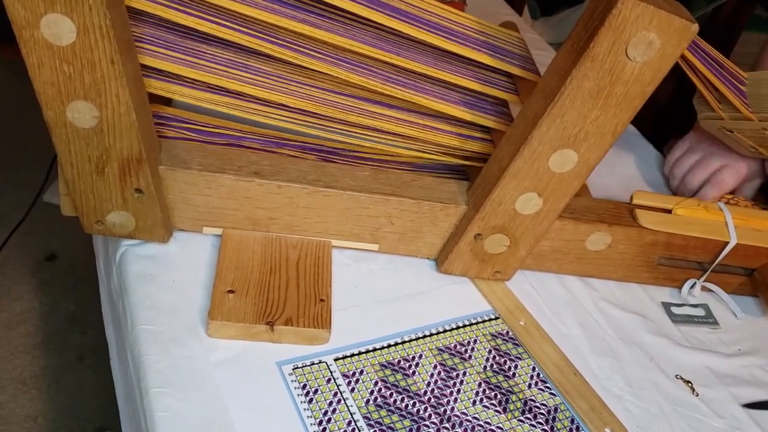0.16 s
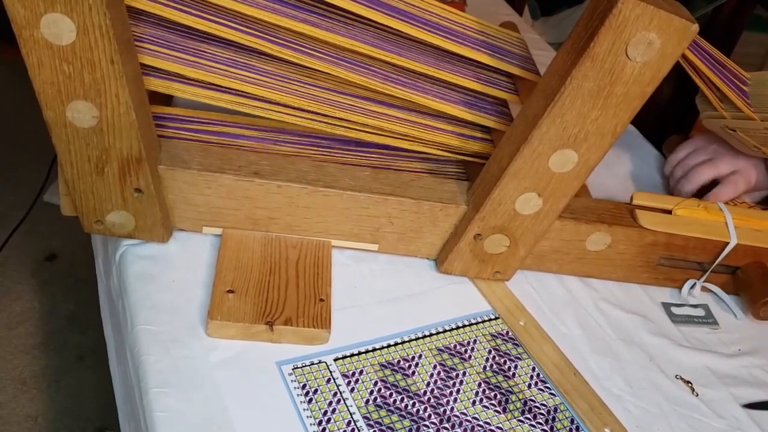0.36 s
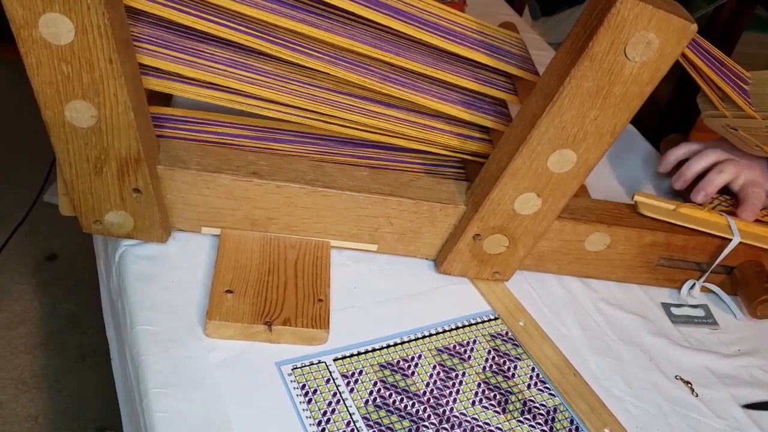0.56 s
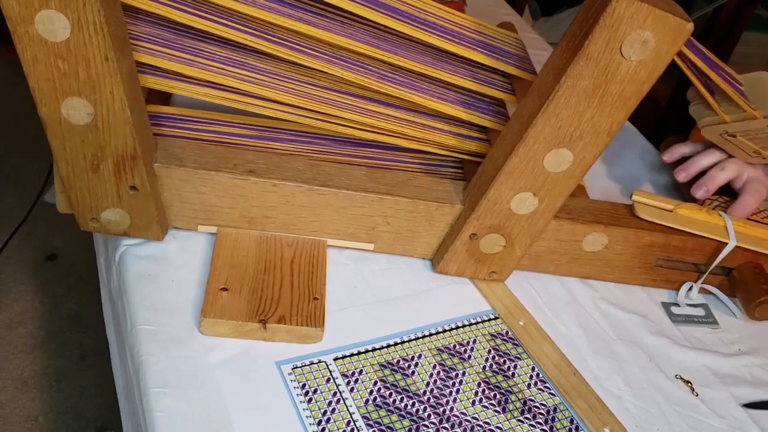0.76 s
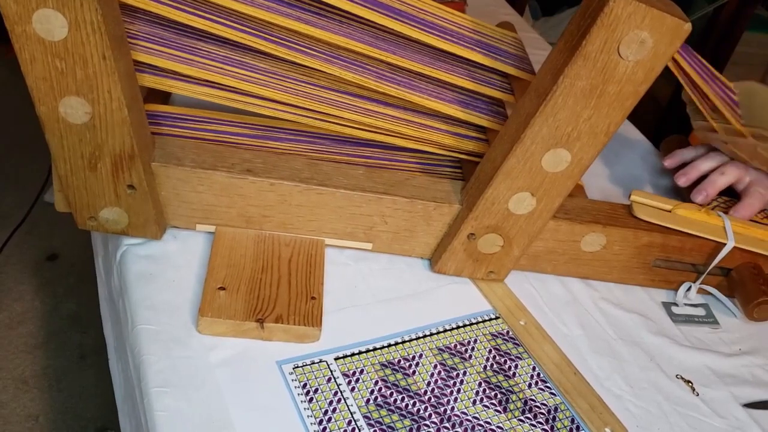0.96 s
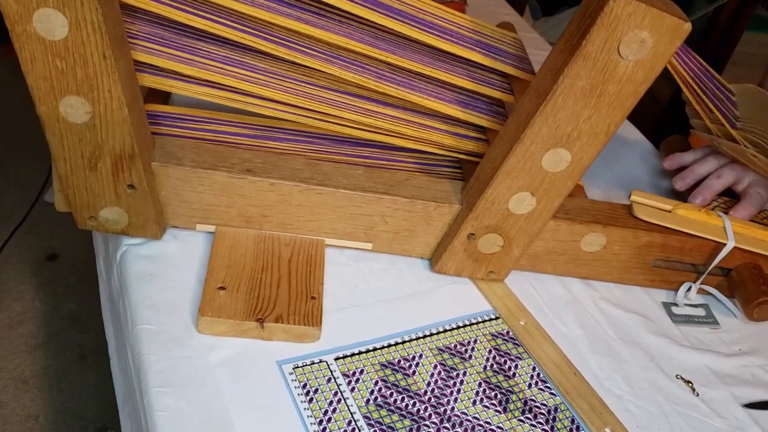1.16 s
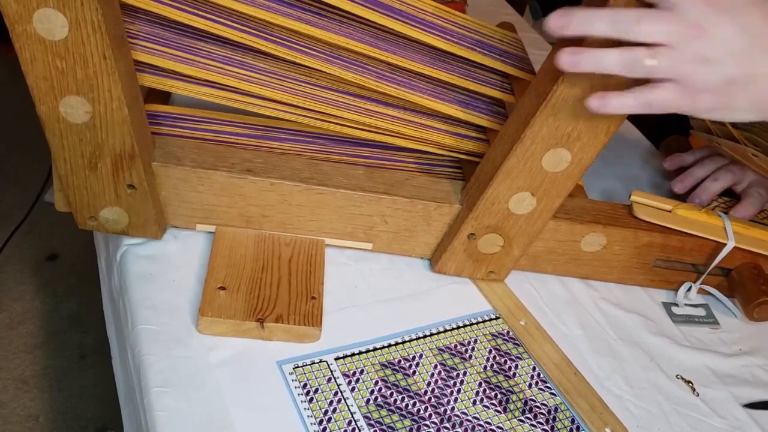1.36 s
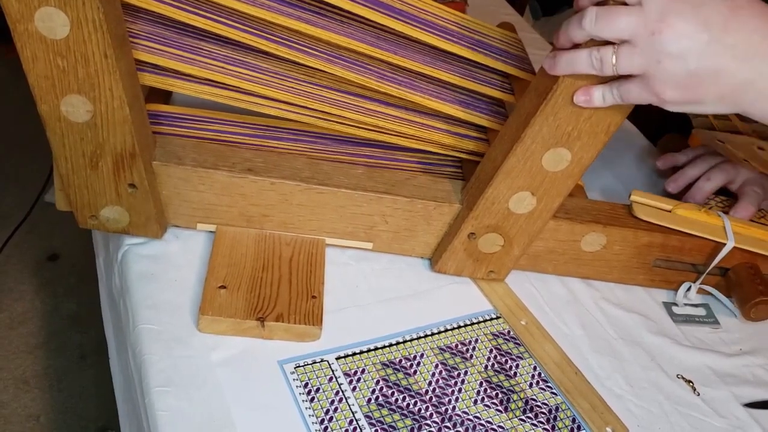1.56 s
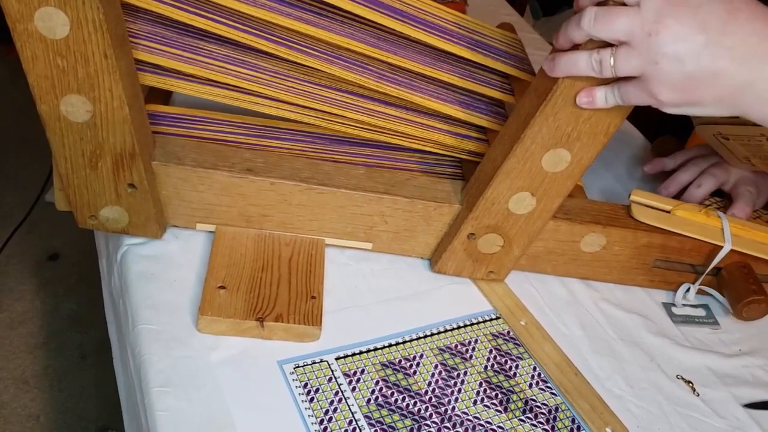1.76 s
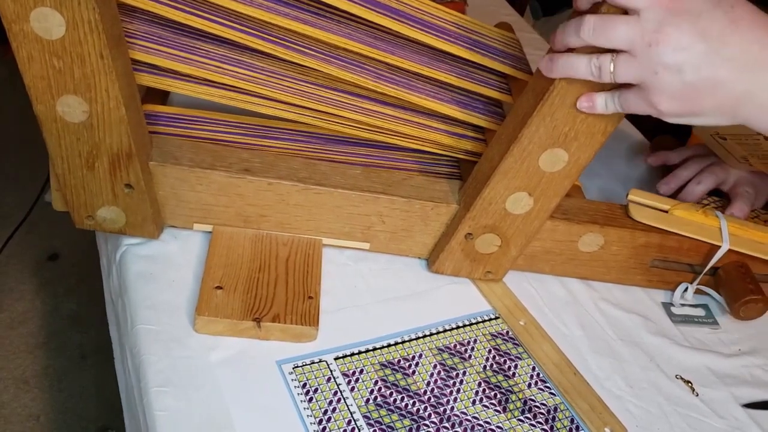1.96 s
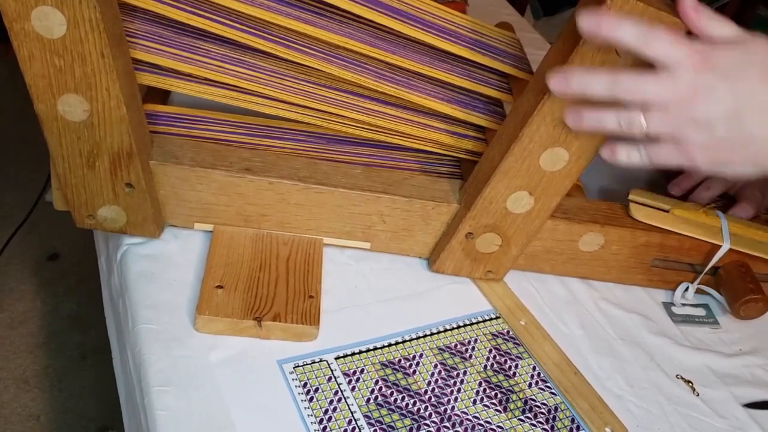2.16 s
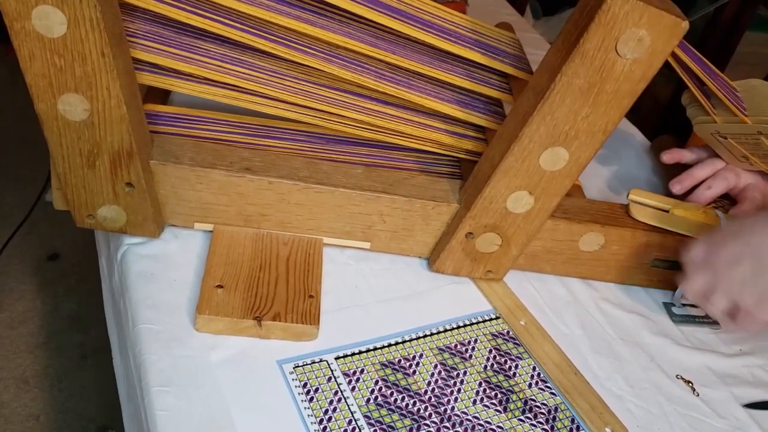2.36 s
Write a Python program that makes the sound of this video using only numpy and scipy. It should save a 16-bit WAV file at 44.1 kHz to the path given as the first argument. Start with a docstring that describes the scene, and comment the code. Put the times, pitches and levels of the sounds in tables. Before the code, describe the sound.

A small wooden loom gives two sharp knocks at about 0.2 and 0.4 seconds, close by in a quiet room. A taut band judders briefly at 0.5 seconds, and threads rub over the wood just after. Near 0.9 seconds a hard tool makes one bright, scraping click, followed by soft thread hiss. From 1.4 to 2.4 seconds fingers lightly brush and bump the frame, with very faint squeaks.

```python
"""A small wooden band loom is worked by hand in a quiet room, close to a pair of microphones.
Two knocks of wood excite the damped modes of its frame, and the taut band judders over it by stick-slip.
A hard tool gives one bright, scraping click. Then threads slide with a soft friction hiss while
fingers bump, brush and squeak on the wood. Short reverberation and a faint rumble lie behind it all."""
import sys
import numpy as np
from scipy import signal
from scipy.fft import rfft, irfft
from scipy.io import wavfile
from scipy.ndimage import uniform_filter1d, minimum_filter1d

SR = 44100
rng = np.random.default_rng(int(sys.argv[2]) if len(sys.argv) > 2 else 0)


def store_wav(level_fs):
    """Save 16-bit WAV to argv[1]."""
    pcm = np.round(np.clip(np.atleast_2d(level_fs), -1, 1) * 32767)
    wavfile.write(sys.argv[1], SR, pcm.T.astype(np.int16))


N = 105840
T = np.arange(N) / SR

# Dull spectrum of soft contacts on the frame (frequency [Hz], level [dB])
PATTER_SPECTRUM = [(30, -19), (80, 6), (330, 4), (650, -8.5), (1300, -23), (3000, -29), (8000, -40.5)]


def knocks():
    """Impact excitation: a crack is filtered by the wood's resonances and sets frame and room ringing."""
    # Blows, one per spot (time [s], swell of the frame [s], then a level [dB] for each band)
    blows = [(.2159, 0.011, -12, -4.5, -18.5, -13, -18.5, -33.5, -11),
             (0.3584, 0.004, -10.5, -1.5, -6.5, -13, -22.5, -36.5, -24)]
    # Bands of those levels (frequency [Hz])
    bands = [150, 330, 700, 2600, 6500, 9300, 13000]
    # Broad resonances of the wood (frequency [Hz], width [Hz], gain at spot 1 [dB], at spot 2 [dB])
    resonances = [(750, 67, 6.5, 6.5), (1102, 78, 9.5, 6.5), (1795, 160, 2.5, 5), (2680, 170, 4.5, 2.5),
                  (2990, 130, -4.5, 6), (3200, 300, 0, -0.5), (3940, 220, 5.5, 7), (4330, 170, -6, 0),
                  (6380, 330, 7, 8)]
    # Frame modes (frequency [Hz], T60 [s], level at spot 1 [dB], at spot 2 [dB])
    frame_modes = [(83, 0.26, -41, -36.5), (126, 0.34, -34.5, -41), (151, .3, -48, -28),
                   (199.8, 0.38, -38.5, -34), (315.7, 0.28, -47, -27), (377.5, 0.2, -34.5, -31),
                   (466.5, 0.18, -40.5, -30), (609, 0.15, -53, -29), (751, 0.14, -32, -28.5),
                   (1104, 0.29, -41, -39.5), (1406, 0.38, -53.5, -43), (1772, 0.15, -30.5, -28.5),
                   (1863, .15, -51.5, -35), (2600, 0.33, -36, -49), (2686, 0.3, -37, -48),
                   (2730, 0.22, -56, -42), (3840, 0.18, -45, -41), (4000, 0.16, -44.5, -39.5)]
    # Spectrum of the direct crack (frequency [Hz], level [dB])
    crack_spectrum = [(40, -19), (150, -8), (600, -7.5), (1300, 0), (2700, 12), (4200, 5), (6500, 7),
                      (8500, 16), (10000, 13.5), (13500, 14.5), (16000, 0)]
    # Spectrum of its reverberation (frequency [Hz], level [dB])
    tail_spectrum = [(30, -20), (55, -1), (130, 3.5), (330, -2.5), (1200, -7.5), (2700, -5), (3900, 1.5),
                     (5000, -5.5), (6500, -1), (8000, 2), (14000, -4), (15500, -16.5)]
    out, grid_hz = np.zeros((2, N)), np.geomspace(40, 16000, 600)
    for spot, (start, swell, *levels) in enumerate(blows):
        wood_db = sum(dbs[spot] / (1 + (2 * (grid_hz - hz) / width) ** 2)
                      for hz, width, *dbs in resonances)
        blow_db = read(list(zip(bands, levels)), grid_hz)
        spectrum = list(zip(grid_hz, blow_db + wood_db))
        crack = colour(near(burst(decay_s=.0036), left_db=2.5, lag_s=.00014), crack_spectrum)
        add(out, start, colour(crack, spectrum))
        tail = colour(echoed(room()), tail_spectrum)
        add(out, start, colour(tail, spectrum) * amp(-1.5))
        body = ring([(hz, dbs[spot], t60) for hz, t60, *dbs in frame_modes])
        body *= 1 - np.exp(-T[:len(body)] / swell)
        # The whole frame radiates, so its ring comes from nearer the middle.
        add(out, start, near(body, left_db=.5, lag_s=.00006))
    return out


def tool_scrapes():
    """Friction pulses: a hard tool catches twice, then rings faintly in free vibration on release."""
    # Catches (time [s], duration [s], level [dB])
    scrapes = [(0.8668, 0.0022, -0.5), (.869, 0.0034, -0.5)]
    # Spectrum of the scraping contact (frequency [Hz], level [dB])
    scrape_spectrum = [(100, -46.5), (800, -31), (3100, -49.5), (3900, -14.5), (4400, -5.5), (5200, -19.5),
                       (6000, -5), (7700, -9), (9000, -22.5), (9800, -6), (10600, -19.5), (11650, -3),
                       (12300, -10.5), (13300, -20), (15200, -4), (16500, -20)]
    # Spectrum of its reverberation (frequency [Hz], level [dB])
    tail_spectrum = [(500, -52.5), (1000, -43.5), (2900, -45.5), (3200, -38.5), (3550, -42.5), (4000, -29),
                     (4550, -22.5), (5400, -30.5), (7700, -28.5), (9000, -35), (9900, -26), (10700, -33.5),
                     (11700, -25.5), (13000, -35.5), (15300, -28.5)]
    # Tool modes (frequency [Hz], level [dB], T60 [s])
    tool_modes = [(860, -49, .11), (1217, -32.5, 0.115), (4107, -48, 0.09), (9798, -43, 0.083)]
    out = np.zeros((2, N))
    for start, length, db in scrapes:
        arch = np.sin(np.pi * np.minimum(T[:4096] / length, 1))
        grip = rng.choice([-1., 1.], (2, 4096)) * arch * amp(db)
        add(out, start, colour(grip * amp([[-6], [1]]), scrape_spectrum))
    release = scrapes[-1][0] + .002
    add(out, release, colour(echoed(room()), tail_spectrum))
    early_tail = diffuse(8192) * np.exp(-T[:8192] / .0079)
    add(out, release, colour(early_tail, tail_spectrum) * amp(4))
    body = ring(tool_modes)
    body *= 1 - np.exp(-T[:len(body)] / .012)
    add(out, release, near(body, left_db=7))
    return out


def tool_squeals():
    """Friction-induced oscillation: the scraping tool sings in gliding chirps of a few milliseconds."""
    # Chirps (time [s], duration [s], pitch [Hz], glide [share of pitch], level [dB], left - right [dB])
    chirps = [(.8672, .0018, 12700, .01, -20.5, -12.5), (.8685, .0046, 11670, -0.046, -13.5, -13.5),
              (0.8686, .0031, 4468, -0.16, -13, -8.5)]
    out, t = np.zeros((2, N)), T[:1024]
    waver_hz = 260
    for start, length, hz, glide, db, left_db in chirps:
        progress = np.minimum(t / length, 1)
        pitch = hz * (1 + glide * (progress - .5)) + waver_hz * wander(t, step=16)
        tone = np.sin(2 * np.pi * np.cumsum(pitch) / SR)
        add(out, start, near(tone * np.sin(np.pi * progress) ** 2 * amp(db), left_db))
    return out


def band_judders():
    """Stick-slip motion: each uneven slip of the taut band excites the modes of the frame."""
    # Runs of slips (time [s], duration [s], slip rate [Hz], relative level [dB], tilt [dB/octave])
    judders = [(0.511, .047, 128, -16, 1), (0.643, .018, 160, -23, 4)]
    # Modes shaken by a slip (frequency [Hz], level [dB], T60 [s])
    slip_modes = [(135.2, 2.5, 0.045), (338, -4, 0.03), (655, -24, 0.047), (766, -31.5, 0.058),
                  (1190, -47.5, 0.067)]
    out, lowest_hz = np.zeros((2, N)), slip_modes[0][0]
    jitter_s, spread_db = .00082, 2
    for start, length, rate_hz, db, tilt in judders:
        tilted = [(hz, level + tilt * np.log2(hz / lowest_hz), t60) for hz, level, t60 in slip_modes]
        slip = near(ring(tilted, size=8192), left_db=-1)
        for at, (late, strength) in zip(np.arange(0, length, 1 / rate_hz), rng.standard_normal((16, 2))):
            add(out, start + at + jitter_s * late, slip * amp(db - 16 + spread_db * strength))
        add(out, start, colour(room(), PATTER_SPECTRUM) * amp(db - 7))
    return out


def loose_ticks():
    """Brief impacts: loose parts radiate broadband clicks, each with one spectral peak."""
    # Contacts (time [s], level [dB], peak frequency [Hz])
    ticks = [(0.2253, -11, 13000), (0.3512, -14.5, 1500), (0.3661, -9, 1750), (0.5137, -23.5, 796),
             (0.6733, -37.5, 13060), (0.8426, -34, 4700), (1.985, -37, 800), (2.019, -26, 644)]
    # Spectrum of a tick (frequency [multiple of the peak], level [dB])
    tick_shape = [(.125, -22), (.6, -7), (1, 0), (1.7, -12), (6, -38)]
    out = np.zeros((2, N))
    for start, db, peak_hz in ticks:
        spectrum = [(peak_hz * ratio, db + level) for ratio, level in tick_shape]
        add(out, start, colour(near(burst(decay_s=.0018), left_db=-1), spectrum))
        add(out, start, colour(room() * amp(-19.5), spectrum))
    return out


def finger_brushes():
    """Sliding friction: skin on wood makes a hollow noise whose pitch sinks as the finger slows."""
    # Strokes (time [s], rise [s], decay [s], level [dB])
    strokes = [(0.324, 0.0056, 0.04, -26), (1.422, 0.0086, 0.036, -29), (1.70, 0.033, 0.066, -47),
               (1.985, 0.044, 0.064, -45.5), (2.333, 0.0083, 0.044, -35)]
    # Spectrum of skin on wood at unit speed (frequency [Hz], level [dB])
    skin_spectrum = [(60, -17), (130, -0.5), (250, -8), (480, 2.5), (620, -8), (960, 4), (1250, -14.5),
                     (1900, -21), (6000, -39.5)]
    out, t = np.zeros((2, N)), T[:SR // 2]
    glide, slowing_s = .3, .036
    speed = 1 + glide * (np.exp(-t / slowing_s) - .6)
    travel = np.cumsum(speed) / SR
    for start, rise, decay, db in strokes:
        friction = colour(diffuse(len(t)), skin_spectrum)
        sinking = np.array([np.interp(travel, t, side) for side in friction])
        add(out, start, sinking * envelope(t, rise, decay) * amp(db))
    return out


def finger_bumps():
    """Damped oscillation: a fingertip pushes the frame into a low swing, with a dull patter."""
    # Pushes (time [s], swing level [dB], frequency [Hz], decay [s], patter level [dB])
    bumps = [(0.079, -50, 134, 0.029, -42.5), (0.579, -41, 195, 0.043, -55), (0.621, -49, 143, .04, -52),
             (0.652, -48, 74.5, 0.044, -50), (.712, -48.5, 210, 0.024, -47), (1, -54.5, 129, 0.021, -52),
             (1.358, -54, 130, 0.014, -67), (1.532, -45.5, 83.9, 0.02, -42.5),
             (1.551, -51, 137.7, 0.053, -31), (1.6, -44.5, 97, 0.03, -41), (1.627, -46, 126.3, 0.024, -42),
             (1.739, -55, 340, .014, -45), (1.91, -46.5, 96, 0.013, -49), (2.018, -41, 436, 0.0052, -38),
             (2.025, -47, 151, .015, -48), (2.037, -41.5, 154.8, 0.016, -41.5),
             (2.113, -51, 123.6, .03, -46), (2.137, -45.5, 136, 0.011, -53), (2.265, -44, 154, 0.016, -51)]
    out, t = np.zeros((2, N)), T[:SR // 2]
    for start, db, hz, decay, patter_db in bumps:
        swing = np.sin(2 * np.pi * hz * t) * envelope(t, .0019, decay)
        add(out, start, swing * amp(db))
        patter = colour(diffuse(len(t)) * np.exp(-t / .018), PATTER_SPECTRUM)
        add(out, start, patter * amp(patter_db))
    return out


def threads():
    """Friction noise: the sliding warp hisses smoothly, and threads rub the wood in grainy strokes."""
    # Envelope of the hiss (time [s], level [dB])
    hiss_levels = [(0, -72), (.15, -59), (.3, -42), (.56, -57), (.76, -58), (.95, -47), (1.1, -54.5),
                   (1.25, -76), (1.58, -67), (1.73, -53.5), (1.92, -66.5), (2.1, -60.5), (2.3, -56),
                   (2.4, -76.5)]
    # Spectrum of the hiss (frequency [Hz], level [dB])
    hiss_spectrum = [(200, -16.5), (3000, -13.5), (5300, -13), (6500, 3), (8200, -16), (10500, -10),
                     (12500, -2.5), (15500, -3.5)]
    # Rubs (time [s], rise [s], decay [s], level [dB], tilt about 5 kHz [dB/octave])
    rubs = [(.603, 0.032, 0.029, -31.5, 3.5), (.662, .012, 0.025, -41.5, 3.5),
            (0.818, 0.011, 0.099, -50.5, 8.5), (1.659, 0.014, 0.093, -65, -13),
            (2.05, 0.022, 0.033, -50, -11.5)]
    # Spectrum of thread on wood (frequency [Hz], level [dB])
    rub_spectrum = [(100, -45), (1000, -25), (3300, -17.5), (4300, -1.5), (5600, -1.5), (7500, -5),
                    (8500, -10), (10700, -13), (11900, -2.5), (16000, -5.5)]
    hiss_gain = amp(np.interp(T, *np.transpose(hiss_levels)))
    out = colour(diffuse(), hiss_spectrum) * hiss_gain * amp([[1.5], [-1.5]])
    t = T[:SR // 2]
    grain_db, clump_db = 3, 2
    for start, rise, decay, db, tilt in rubs:
        roughness = amp(grain_db * wander(t, step=64) + clump_db * wander(t, step=400))
        stroke = (1 - np.exp(-(t / rise) ** 2)) * np.exp(-t / decay)
        spectrum = [(hz, level + db + tilt * np.log2(hz / 5000)) for hz, level in rub_spectrum]
        add(out, start, colour(diffuse(len(t)) * roughness * stroke, spectrum))
    return out


def finger_squeaks():
    """Friction-induced oscillation: skin on varnish gives wavering tones that fade as it takes hold."""
    # Squeaks (time [s], rise [s], decay [s], frequency [Hz], level [dB])
    squeaks = [(1.528, 0.0033, .014, 2650, -57.5), (1.696, 0.0075, 0.019, 2370, -60),
               (1.72, .02, .08, 2450, -69.5)]
    out, t = np.zeros((2, N)), T[:SR // 2]
    for start, rise, decay, hz, db in squeaks:
        pitch = hz * (1 + .09 * wander(t, step=64))
        tone = np.sin(2 * np.pi * np.cumsum(pitch) / SR) * envelope(t, rise, decay) * amp(db)
        add(out, start, tone)
        tail = room()
        tail /= np.linalg.norm(tail[0])
        add(out, start, signal.fftconvolve(tone[None], tail, axes=1) * amp(-2.5))
    return out


def echoed(x):
    """Early reflections: the posts and the table add delayed, weaker copies of a sound."""
    # Reflections (delay [s], level [dB])
    echoes = [(.0007, -13.5), (.0016, -14), (.0031, -12)]
    out = x.copy()
    for delay, db in echoes:
        add(out, delay, x * amp(db))
    return out


def room(size=32768):
    """Reverberation: a diffuse tail builds up, slowest in the bass, and each band dies at its own rate."""
    # Reverberation times (frequency [Hz], T60 [s])
    decay_times = [(100, 0.58), (300, 0.19), (1000, .24), (3000, 0.23), (7000, 0.2), (14000, 0.31)]
    rise_s, rise_cycles = .0013, 2
    hz, t, spectra = signal.stft(diffuse(size), SR, nperseg=512)
    build = 1 - np.exp(-(t + rise_s) * hz[:, None] / rise_cycles)
    decay = amp(-60 * t / read(decay_times, hz)[:, None])
    _, tail = signal.istft(spectra * build * decay, SR, nperseg=512)
    return tail * (1 - np.exp(-T[:size] / rise_s))


def room_noise():
    """Stationary noise: a faint rumble and hiss fill the room."""
    # Background spectrum (frequency [Hz], level [dB])
    spectrum = [(20, -16), (35, -6), (60, 2), (110, -0.5), (200, -6.5), (330, -11), (650, -17.5),
                (5500, -25), (6700, -24.5), (9000, -33), (11600, -20), (16000, -16.5)]
    noise = colour(diffuse(), spectrum)
    return noise / noise.std() * amp(-60)


def diffuse(size=N):
    """Diffuse field: noise from all sides is coherent between the microphones only in the bass."""
    # Likeness of left and right (frequency [Hz], correlation [0-1])
    correlation = [(100, 0.87), (330, .93), (650, 0.35), (1300, 0), (3000, 0)]
    left, independent = rfft(rng.standard_normal((2, size)))
    shared = np.clip(read(correlation, np.fft.rfftfreq(size, 1 / SR)), 0, 1)
    right = shared * left + np.sqrt(1 - shared ** 2) * independent
    return irfft(np.array([left, right]), size)


def near(x, left_db, lag_s=.00018):
    """Path difference: direct sound reaches the left microphone later; left_db is left minus right."""
    lag = np.exp(-2j * np.pi * np.fft.rfftfreq(len(x), 1 / SR) * lag_s)
    return np.array([irfft(rfft(x) * lag, len(x)) * amp(left_db / 2), x * amp(-left_db / 2)])


def ring(modes, size=32768):
    """Modal superposition: a struck object rings as a sum of damped sines of alternating sign."""
    t = T[:size]
    return sum((-1) ** k * amp(db - 60 * t / t60) * np.sin(2 * np.pi * hz * t)
               for k, (hz, db, t60) in enumerate(modes))


def burst(decay_s, size=16384):
    """Contact noise with a flat spectrum and an exponential decay."""
    return rng.choice([-1., 1.], size) * np.exp(-T[:size] / decay_s)


def envelope(t, rise_s, decay_s):
    """Exponential build-up and decay."""
    return (1 - np.exp(-t / rise_s)) * np.exp(-t / decay_s)


def wander(t, step):
    """Random modulation: straight lines join values drawn every step samples."""
    return np.interp(t, t[::step], rng.standard_normal(len(t[::step])))


def colour(x, spectrum, size=4096):
    """Minimum-phase filtering to a spectrum of (frequency [Hz], level [dB]) points."""
    log_gain = np.log(amp(read(spectrum, abs(np.fft.fftfreq(size, 1 / SR)))))
    taps = np.fft.ifft(np.exp(np.conj(signal.hilbert(log_gain)))).real
    return signal.fftconvolve(x, taps[None, :size // 2], axes=1)[:, :x.shape[1]]


def read(points, hz):
    """Interpolation on a log-frequency axis."""
    frequencies, values = np.transpose(points)
    return np.interp(np.log(hz + 1), np.log(frequencies + 1), values)


def amp(db):
    """Decibels to amplitude ratio."""
    return 10 ** (np.asarray(db) / 20)


def add(mix, start_s, sound):
    """Superposes a sound on the mix from a given time."""
    part = mix[:, max(round(start_s * SR), 0):][:, :sound.shape[-1]]
    part += sound[..., :part.shape[1]]


def scene():
    """Linear superposition: the pressures of all sources add."""
    return (knocks() + tool_scrapes() + tool_squeals() + band_judders() + loose_ticks()
            + finger_brushes() + finger_bumps() + threads() + finger_squeaks() + room_noise())


def record(dry):
    """Transduction: two microphones of unequal response, then a bass cut, peak limiter and low-pass."""
    # Microphone mismatch (frequency [Hz], left boost and right cut [dB])
    mismatch = [(220, 0), (700, .9), (1300, 0), (2600, 1.8), (4500, .3), (6500, 2), (9000, -.3),
                (13000, -1.4)]
    bass_cut_hz, ceiling, treble_cut_hz = 35, .97, 16100
    left_gain = amp(read(mismatch, np.fft.rfftfreq(N, 1 / SR)))
    x = irfft(rfft(dry) * np.array([left_gain, 1 / left_gain]), N)
    x = signal.sosfilt(signal.butter(2, bass_cut_hz, "highpass", fs=SR, output="sos"), x)
    allowed_gain = ceiling / np.maximum(abs(x).max(0), ceiling)
    x *= uniform_filter1d(minimum_filter1d(allowed_gain, size=9), size=9)
    lowpass = signal.firwin(255, treble_cut_hz, window=("kaiser", 9), fs=SR)
    return signal.oaconvolve(x, lowpass[None], "same")


dry = scene()
out = record(dry)
store_wav(out)
```